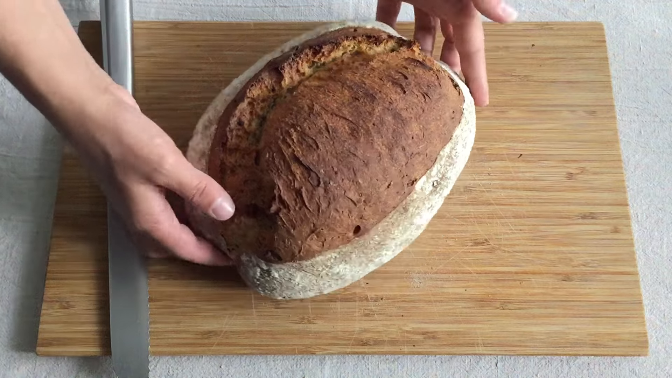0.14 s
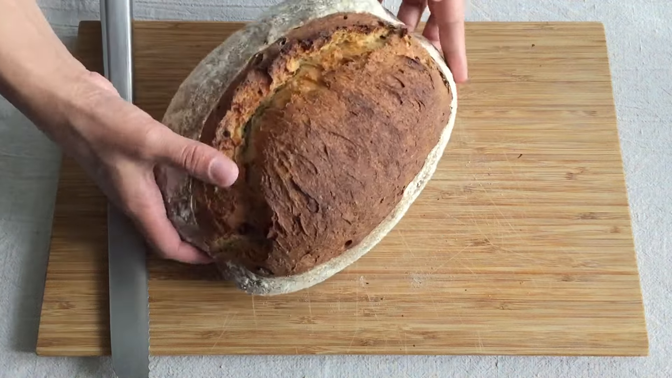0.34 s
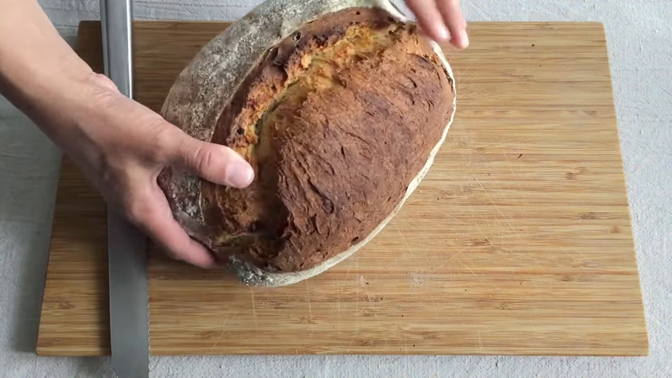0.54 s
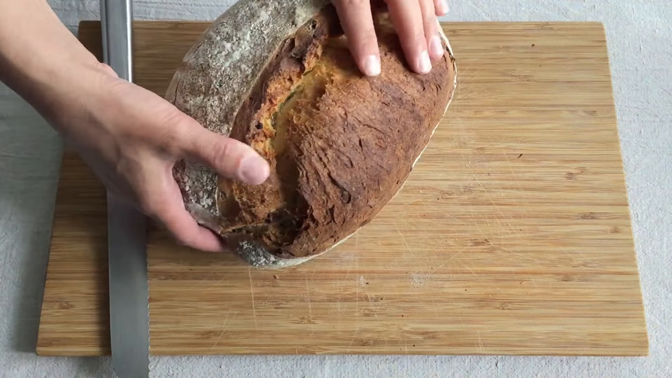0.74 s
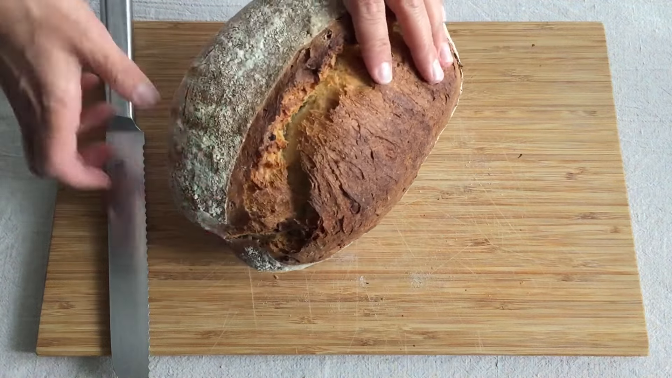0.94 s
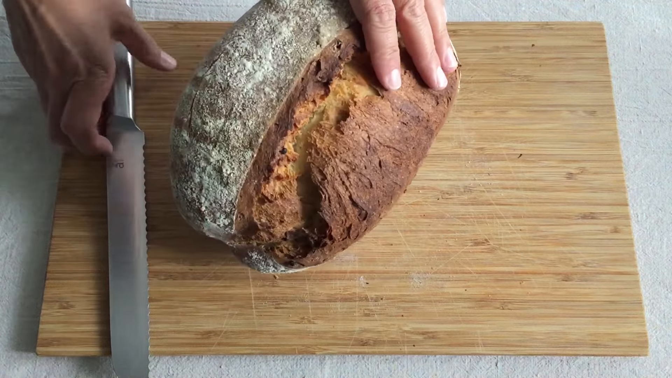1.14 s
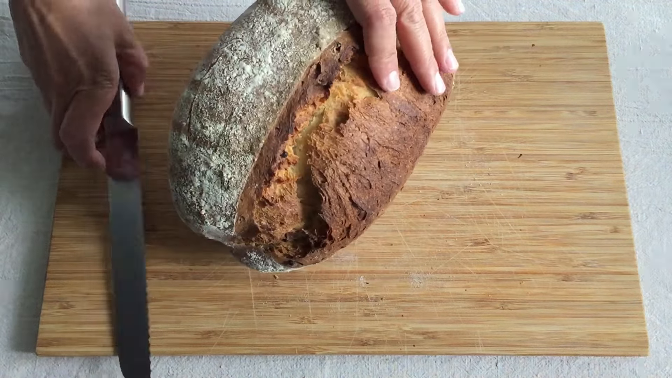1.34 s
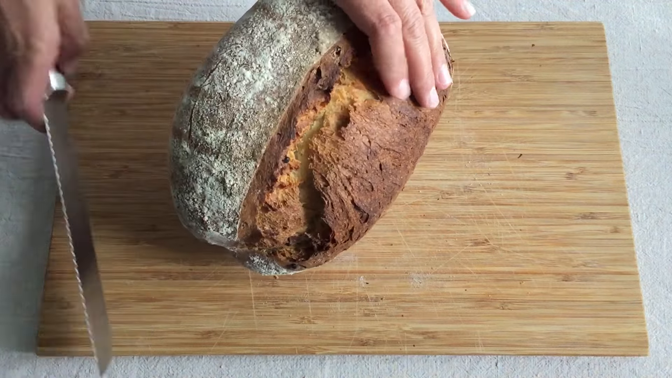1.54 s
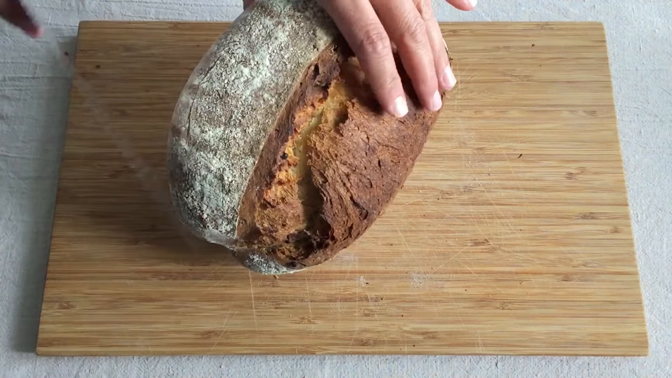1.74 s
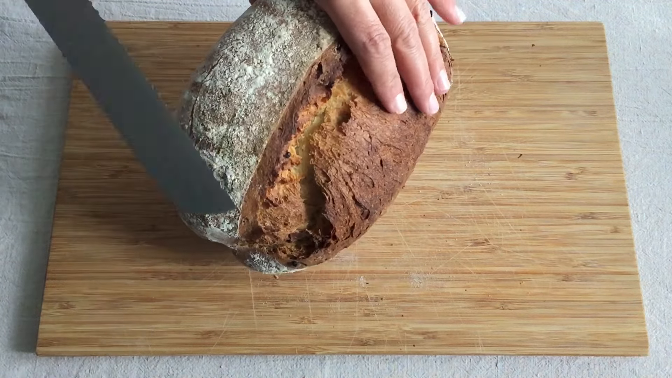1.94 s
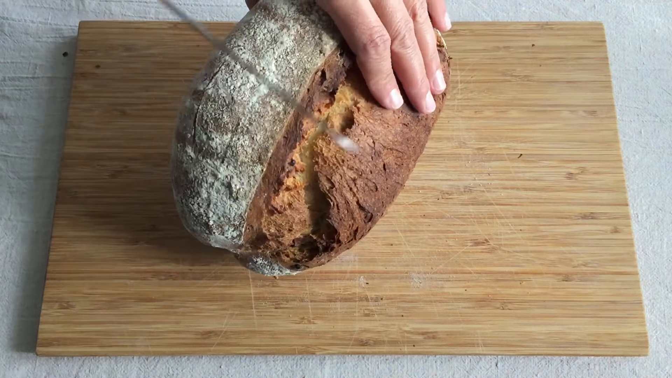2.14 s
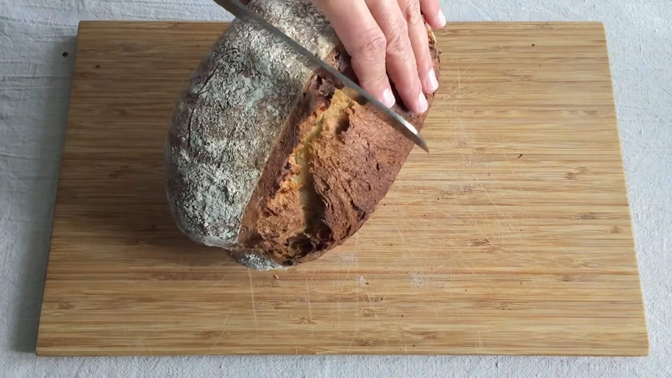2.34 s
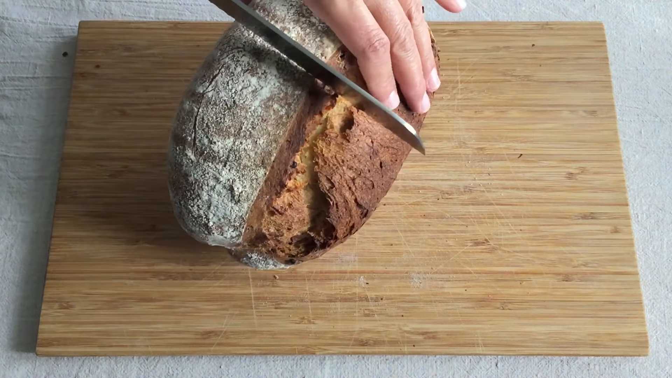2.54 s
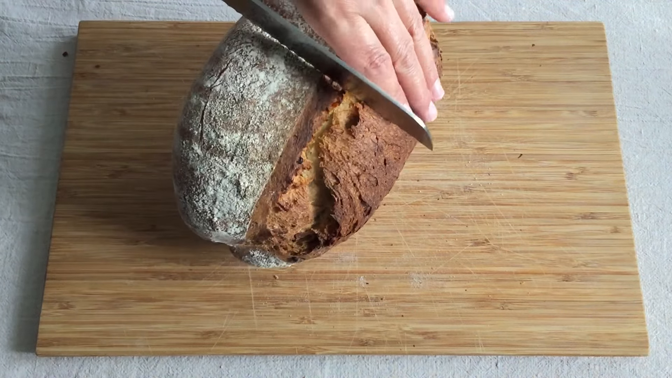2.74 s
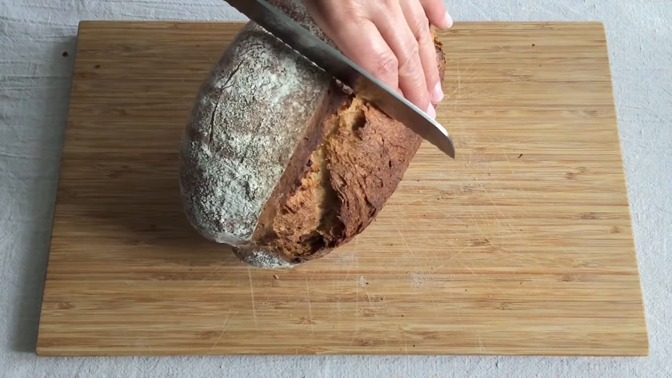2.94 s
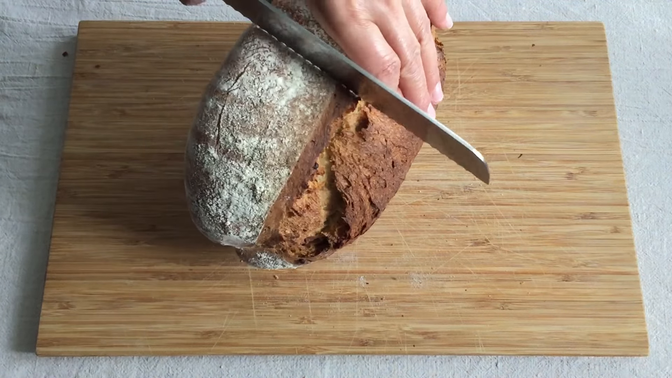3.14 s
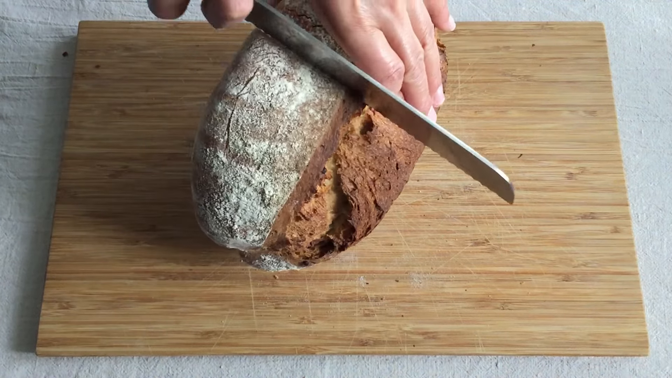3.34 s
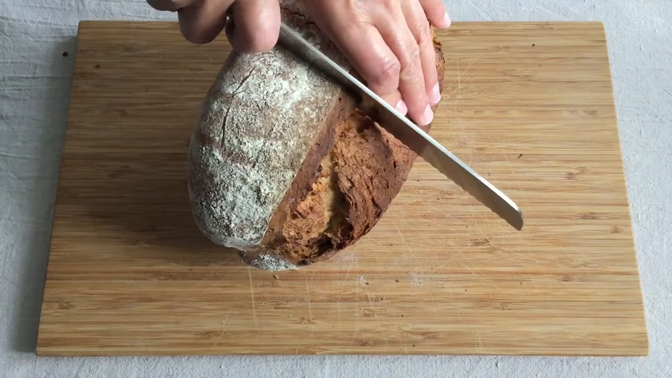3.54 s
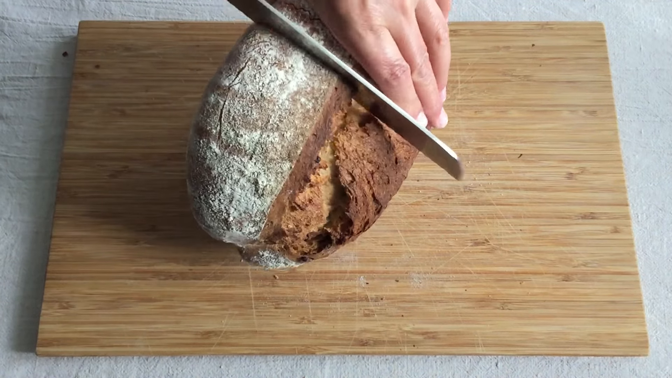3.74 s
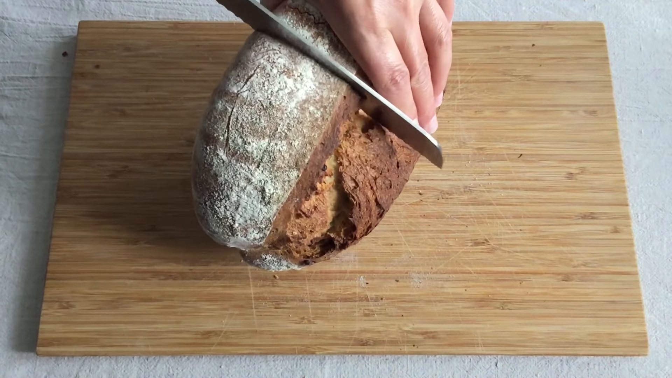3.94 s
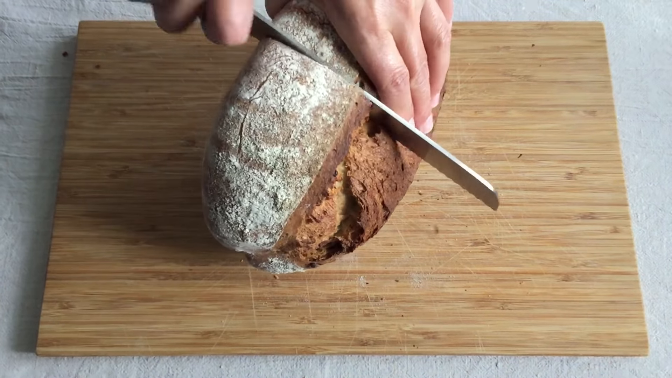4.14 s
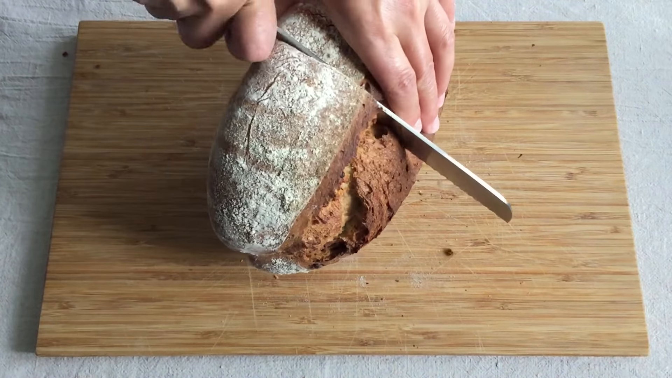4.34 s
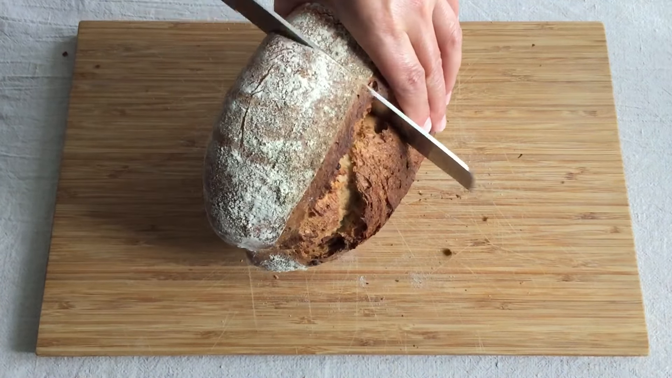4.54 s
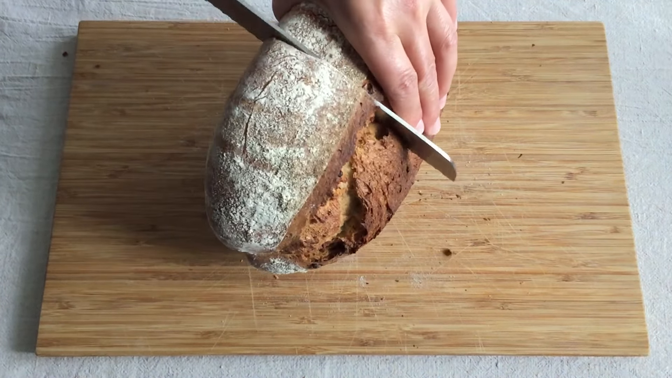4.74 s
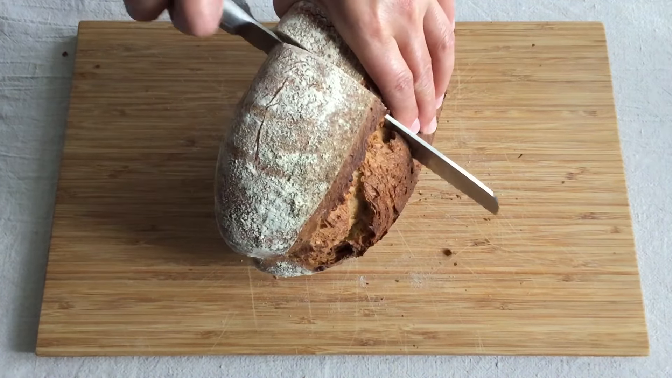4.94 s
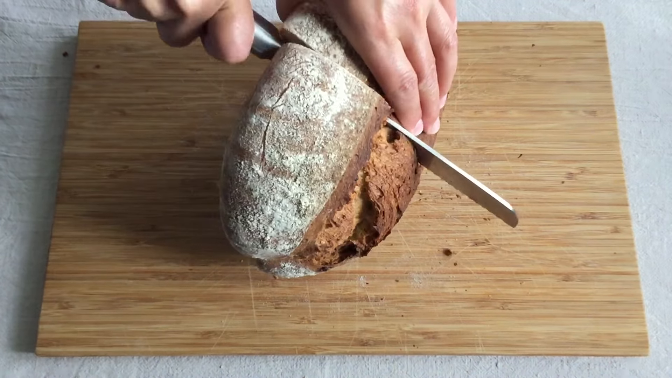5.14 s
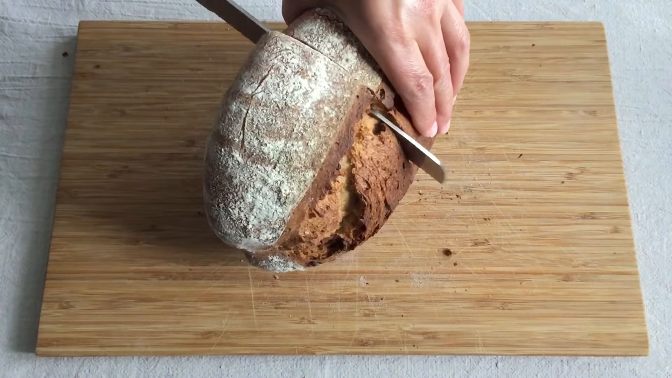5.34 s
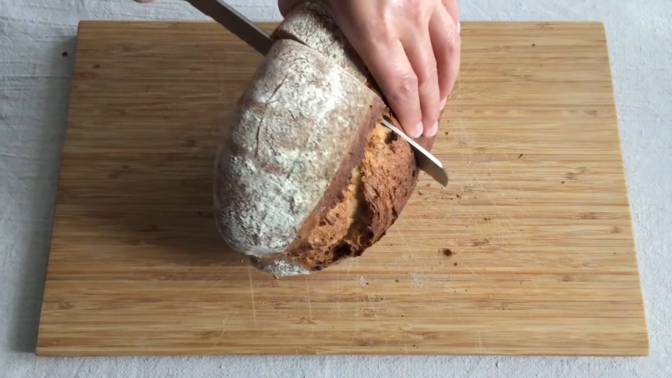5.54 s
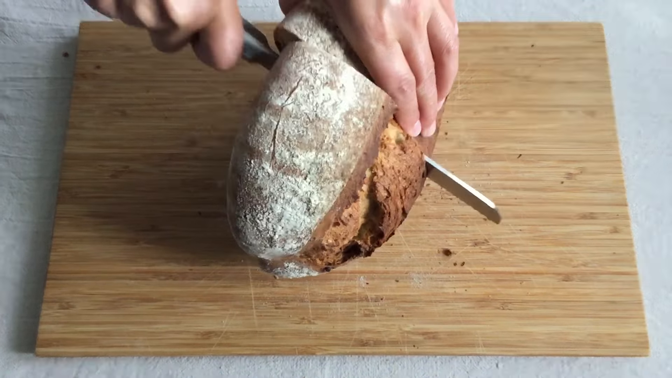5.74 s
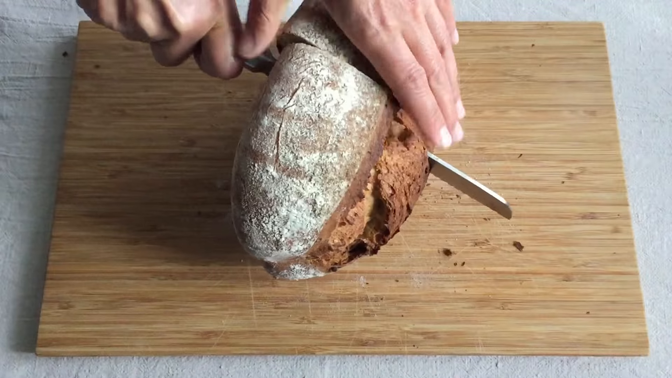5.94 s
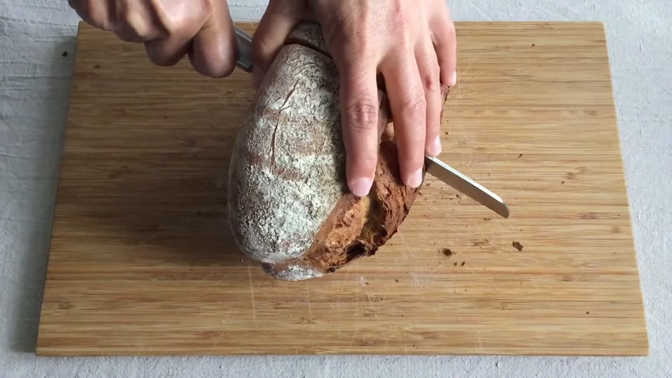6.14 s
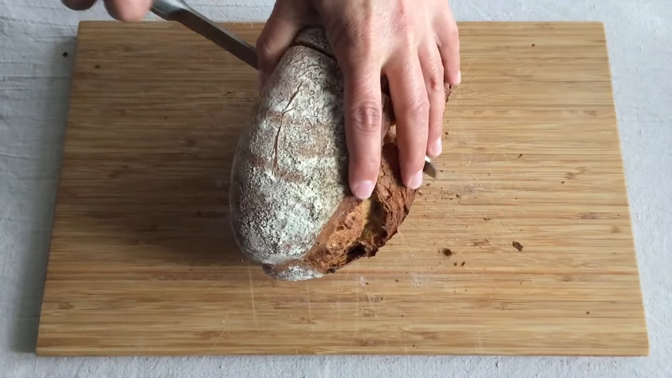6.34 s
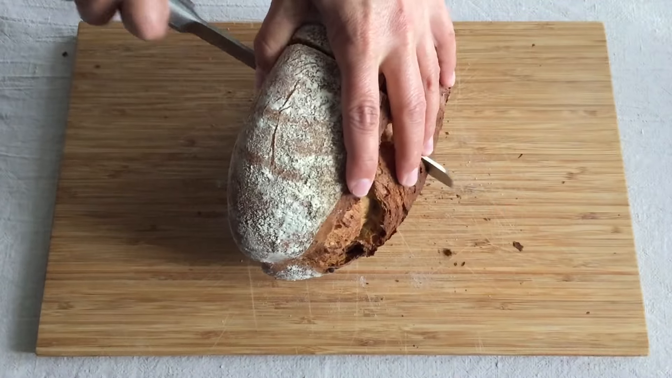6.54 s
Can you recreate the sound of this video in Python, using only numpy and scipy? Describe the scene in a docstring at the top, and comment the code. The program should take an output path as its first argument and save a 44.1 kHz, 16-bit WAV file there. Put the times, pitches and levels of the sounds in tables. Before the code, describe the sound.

A close, single-channel sound in a small kitchen, with soft air and a faint low appliance hum throughout and a short echo. From 0 to 0.8 s a crusty loaf is turned on a wooden board: dull low rumble, soft uneven scrapes, floury hiss, and a cluster of crisp flake ticks around 0.55 s. A gentle rub follows at 1.1 s. At 1.4 s the knife is picked up with a firm knock, a brief damped steel ring and clatter. Light sliding at 2.2 s and a small tap at 2.5 s lead to sawing at 3.0 s. Strokes come unevenly, strongest around 3.0, 3.8 and 4.1 s, with hollow drumming, gritty rasp, bright snaps and crumbly crunches. The rasp grows fuller after about 3.4 s. More bursts come at 4.6, 5.0, 5.3 and 5.6 s; after a near-quiet gap, softer strokes follow at 6.3 and 6.6 s.

```python
"""Small kitchen, one channel, close enough to the board that direct sound outweighs the echo; air and an appliance hum
run throughout. First a crusty loaf is turned on a wooden board: crust rubs on wood and dry flakes tick, over worktop rumble.
Then a serrated knife is picked up with a knock; its steel rings from damped modes, over a thud and a clatter.
From three seconds on it saws in strokes: noise grains from catching teeth drum loaf and board, rasp and crackle,
while noise bursts make the splits of the crust and the deeper bites."""
import sys
import numpy as np
from scipy import signal
from scipy.fft import rfft, irfft
from scipy.io import wavfile

SR = 44100
rng = np.random.default_rng(int(sys.argv[2]) if len(sys.argv) > 2 else 0)


def generate_wav(sig):
    """Save sig (samples, or channels by samples) to the path in sys.argv[1] as 16-bit PCM at SR."""
    pcm = np.round(np.clip(np.atleast_2d(sig).T, -1, 1) * 32767).astype(np.int16)
    wavfile.write(sys.argv[1], SR, pcm)


N = 294940

# Spectrum shape of the still air: [f/Hz, level/dB per Hz]
AIR_SPECTRUM = [(12, -23), (20, -36), (48, 3), (79, -10), (116, -9.5), (168, -13), (399, -23.5), (513, -26),
                (660, -28), (2390, -33.5), (10500, -42.5), (13500, -44), (16000, -44)]
# Appliance hum: [f/Hz, width/Hz, rms level/dB]
HUM_BANDS = [(47, 18, -78), (64.93, 1.4, -52.5), (98.43, 1.64, -56.5), (137.5, 9.6, -66)]
# Worktop shaking under the board: [start t/s, speed-up t/s, hold t/s, slow-down t/s, level/dB]
WORKTOP_SHAKES = [(-.1, 0.09, 0.096, 0.37, -43.5), (.6, 0.22, 0.26, 0.28, -53.5),
                  (1.7, 0.25, 1, 0.15, -56.5), (3.35, .2, 0.35, 0.17, -55), (4.0, 0.094, 0.12, 0.55, -54),
                  (4.9, 0.085, 0.093, 0.33, -50), (5.5, 0.25, 0.077, 0.34, -47.5)]
# Resonances of loaf on board: [f/Hz, width/Hz, level/dB]
LOAF_MODES = [(135.3, 31, 0.5), (180, 40, -2), (243, 62, 6), (289.6, 47, -2), (341.4, 29, -8),
              (662, 103, -9.5), (754.6, 26, -2.5), (944, 31, -10)]
# Spectrum shape of the scrape on wood: [f/Hz, level/dB per Hz]
SCRAPE_SPECTRUM = [(120, -5), (200, 9.5), (269, -4.5), (325, -3), (929, 2), (1800, -4.5), (5000, -18),
                   (6500, -39), (11000, -120)]
# Spectrum shape of the floury hiss: [f/Hz, level/dB per Hz]
FLOUR_SPECTRUM = [(1760, -4), (3000, -3), (3170, -17), (3790, -7), (6800, -6.5), (10800, -7.5), (15500, 5)]
# Loaf, hands and blade sliding: [start t/s, speed-up t/s, hold t/s, slow-down t/s,
# scrape level/dB, hum level/dB, floury hiss level/dB, finest hiss level/dB]
SLIDE_MOVES = [(-.05, 0.045, 0.1, 0.039, -64, -71, -91, -85),
               (0.1, 0.055, 0.02, 0.15, -49.5, -64, -59, -71),
               (0.24, 0.065, 0.037, 0.081, -52, -78, -64.5, -69),
               (0.33, 0.051, 0.048, 0.051, -60, -71, -60, -62),
               (0.43, 0.066, 0.12, 0.044, -60, -74, -72, -67),
               (0.53, 0.0067, 0.036, 0.047, -77, -81, -76, -58),
               (0.59, 0.069, 0.068, 0.089, -50, -69, -56.5, -66),
               (0.71, 0.048, 0.058, 0.066, -63.5, -69, -54.5, -62),
               (0.86, 0.012, 0.012, .02, -76, -80, -70, -55), (0.98, 0.015, .04, 0.033, -80, -77, -74, -81),
               (1.11, 0.076, 0.13, 0.076, -55, -64.5, -62, -67),
               (1.4, 0.027, 0.27, 0.11, -77, -82, -78, -70), (1.7, 0.06, 0.063, 0.053, -81, -85, -72, -66),
               (1.93, 0.056, .05, .06, -87, -84, -82, -67), (2.17, 0.037, 0.083, 0.096, -54, -56, -60, -67),
               (2.34, 0.048, 0.078, 0.046, -64.5, -63, -73, -75),
               (2.6, 0.028, 0.037, 0.059, -72, -78, -90, -85),
               (2.84, 0.069, 0.088, 0.065, -72, -78, -89, -80)]
# Resonances of a dry flake of crust: [f/Hz, width/Hz, level/dB]
FLAKE_MODES = [(3500, 1400, -40), (6220, 550, 10.5), (8700, 1400, 10.5)]
# Flakes ticking off under the fingers: [t/s, ring peak level/dB, top click re ring level/dB]
FLAKE_TICKS = [(0.173, -39, -15), (.315, -53, 10), (0.37, -47, 15), (.539, -14.5, -26), (0.544, -38, -8),
               (0.553, -38, -20), (.569, -36, -15), (.581, -29.5, -10), (.639, -27.5, -11), (.671, -27, -2),
               (.842, -49, 11), (0.994, -54, -5)]
# Modes of the knife's steel: [f/Hz, level/dB, longest t60 t/s]
KNIFE_MODES = [(479, -13, .5), (576, -7, .3), (824, -8, .3), (899, -2, .2), (1017, -4, .2), (1093, 0, .2),
               (1152, -3, .5), (1254, -7, .45), (1427, -4, .45), (1577, -6, .3), (1653, -10, .45),
               (2155, -6, .25), (2277, -4, .2), (2455, -1, .65), (2915, 3, .42), (3400, -8, .25),
               (3526, -5, .5), (3862, -6, .3), (4646, -4, .28), (4829, -14, .3), (5911, -24, .3)]
# Spectrum shape of the dull clatter: [f/Hz, level/dB per Hz]
CLATTER_SPECTRUM = [(120, -31), (200, -10.5), (572, 0), (620, -17), (1140, -3.5), (2680, -8.5),
                    (3000, -27.5), (3250, -10), (9000, -43.5), (11700, -78), (19800, -120)]
# Knife against board and loaf: [t/s, thud peak level/dB, steel ring re thud level/dB,
# bright contact gain level/dB, clatter re thud level/dB, clatter t60 t/s]
KNIFE_KNOCKS = [(1.033, -45.5, -22, 24, -6.5, 0.086), (1.397, -18.5, -1.5, 12, -11, 0.37),
                (1.412, -25, -14, 9, -11, .1), (1.428, -24, -9, 9, -9, 0.25),
                (1.54, -40, -17, -8, -6, 0.15), (2.532, -36.5, -5, 0, -9, 0.07)]
# Spectrum shape of the breaking crust: [f/Hz, level/dB per Hz]
CRUST_SPECTRUM = [(1470, -29), (2500, -2.5), (4270, -4), (4620, -5), (4950, -8), (6110, -2.5), (7650, -7.5),
                  (9150, -7), (10200, -14), (10800, -9), (11600, -7.5), (14900, 0), (16000, 8)]
# The blade splits the crust: [t/s, peak level/dB, centre f/Hz]
CRUST_SPLITS = [(2.945, -37, 4000), (3.0252, -23, 14700), (3.062, -15, 14800), (3.2805, -18.5, 3300),
                (3.361, -24.5, 3260), (3.405, -15, 15300), (3.4537, -15.5, 14700), (3.4955, -11.5, 3260),
                (3.518, -13.5, 14400), (3.529, -21, 14400), (3.5774, -13.5, 15000), (3.6713, -24, 9300),
                (3.7728, -17.5, 5700), (3.9739, -23.5, 13800), (4.009, -16, 15300), (4.0446, -13, 12200),
                (4.08, -15, 6560), (4.113, -15, 9600), (4.195, -18.5, 6800), (4.2354, -17, 14700),
                (4.483, -27, 3140), (4.605, -18.5, 15700), (4.647, -33.5, 3380), (4.84, -31, 3800),
                (4.8927, -14.5, 16500), (4.948, -23.5, 6560), (4.9808, -22, 6400), (4.992, -25, 14700),
                (5.064, -12, 3400), (5.116, -22, 6360), (5.126, -20, 9600), (5.137, -23, 9400),
                (5.2503, -35, 12000), (5.3036, -30, 3200), (5.3402, -22, 14000), (5.4116, -36, 3950),
                (5.4548, -45, 3500), (5.5736, -29, 4090), (5.5993, -14, 14300), (5.615, -11.5, 14700),
                (5.653, -17.5, 15000), (5.743, -17, 6400), (5.852, -36, 12000), (5.9018, -37, 11500),
                (5.9626, -41, 3300), (6.2973, -28.5, 15400), (6.322, -28, 7000), (6.3618, -29, 3380),
                (6.556, -25.5, 3600), (6.614, -28, 3170), (6.6567, -21.5, 3280)]
# Teeth bite deep and the crumb crunches: [t/s, peak level/dB, centre f/Hz]
CRUMB_BITES = [(3.026, -25.5, 670), (3.06, -24.5, 970), (3.28, -34.5, 660), (3.359, -40, 880),
               (3.37, -29.5, 1140), (3.4, -34.5, 1120), (3.452, -43, 2400), (3.494, -32, 2400),
               (3.519, -27, 1000), (3.576, -25.5, 640), (3.67, -39, 643), (3.733, -33, 622),
               (3.778, -28.5, 861), (3.804, -20.5, 526), (3.836, -23, 832), (3.88, -27, 700),
               (4.007, -26, 885), (4.046, -23, 930), (4.083, -21.5, 945), (4.113, -20, 725),
               (4.151, -23.5, 750), (4.193, -24, 2300), (4.307, -33.5, 773), (4.606, -36, 563),
               (4.845, -35, 732), (4.893, -34, 665), (4.927, -28, 610), (4.992, -25, 596), (5.03, -30, 500),
               (5.065, -23, 646), (5.315, -44, 595), (5.341, -40, 533), (5.36, -31, 606), (5.391, -32, 670),
               (5.414, -34.5, 1880), (5.438, -36, 732), (5.598, -34.5, 640), (5.615, -36, 780),
               (5.653, -33, 750), (5.672, -22.5, 770), (5.722, -26, 762), (5.744, -22, 1050),
               (5.78, -29, 926), (5.826, -31.5, 743), (6.298, -41, 751), (6.323, -33, 930),
               (6.335, -36, 738), (6.352, -28.5, 700), (6.363, -29.5, 646), (6.403, -34, 1030),
               (6.584, -33, 775), (6.614, -33, 729), (6.633, -26, 759), (6.653, -28, 770),
               (6.671, -23.5, 716)]
# Spectrum shape of the rasping teeth: [f/Hz, level/dB per Hz]
RASP_SPECTRUM = [(290, -16), (500, 2.5), (849, 4.5), (926, 5.5), (1050, -1), (2000, -0.5), (5000, -20),
                 (6500, -49), (11000, -120)]
# Sawing strokes: [start t/s, speed-up t/s, hold t/s, slow-down t/s,
# drumming level/dB, rasp level/dB, crackle level/dB, finest fizz level/dB], before sinking, stalls and bunching
SAW_STROKES = [(3.005, 0.031, 0.024, 0.1, -33.5, -36.5, -39.5, -33),
               (3.19, 0.014, 0.024, 0.077, -52, -47, -52, -46),
               (3.275, 0.0083, 0.013, 0.12, -45.5, -49, -54.5, -48),
               (3.35, 0.059, 0.14, 0.1, -42.5, -43, -45, -52),
               (3.66, 0.0097, .01, 0.22, -51, -54, -57.5, -49),
               (3.71, 0.092, 0.042, 0.14, -31, -39.5, -39.5, -39),
               (3.975, 0.064, 0.13, 0.24, -30, -36.5, -40, -27.5),
               (4.46, 0.013, 0.055, 0.052, -67, -63.5, -59.5, -46),
               (4.54, 0.057, 0.042, 0.057, -38, -48.5, -47, -61),
               (4.833, 0.014, 0.12, 0.064, -43, -43.5, -54.5, -55),
               (4.95, 0.11, 0.029, 0.1, -34, -37.5, -45, -50),
               (5.26, 0.11, 0.065, 0.051, -33.5, -43.5, -50.5, -47),
               (5.575, 0.053, 0.11, 0.17, -43, -38, -44.5, -49),
               (5.93, 0.028, 0.021, 0.04, -72, -64, -64.5, -68),
               (6.28, 0.056, 0.028, 0.13, -40.5, -49.5, -50.5, -50),
               (6.55, 0.091, .1, .05, -39.5, -41.5, -44.5, -45)]

AIR_DB = -62  # rms above 110 Hz, around which the air wavers
ROOM_DB, ROOM_T60_S, ROOM_TOP_T60_S = -7.5, 0.45, 0.26
TOP_HZ = 15850
FIZZ_HZ = 9800  # edge between crackle and finest fizz
# exponents on speed squared: scrape, hum, hiss, finest hiss
SLIDE_POWER = (1.2, 2.6, 3.2, 1.8)
# exponents on speed squared, and change as the blade sinks in each stroke: drumming, rasp, crackle, fizz
SAW_POWER, SINK_DB_PER_S = (1.75, 0.63, 0.81, 1.3), (2.5, -7, -20.5, -31)
# loss as the blade stalls just before a bite: drumming, rasp, crackle, fizz
STALL_DB, STALL_S = (2.3, 6.6, 6, 3), 0.01
HELD_RING = 1.8  # longest ring of the held steel, in clatter lengths
SNAP_DB, SHOWER_DB, SHOWER_S = 5.5, -6, 0.018
INTO_LOAF_DB = -12.5  # crunch in the loaf, re the split
BREAK_THROUGH_S, BREAK_TAKES_S, RASP_EDGE_HZ = 3.44, 0.078, 1400


def undb(db):
    """Decibels to gain."""
    return 10 ** (np.asarray(db) / 20)


def level(x, db):
    """Scale to an rms level."""
    return x * undb(db) / np.sqrt(np.mean(x ** 2))


def colour(x, points):
    """Causal filter with the given (Hz, dB) response, built from the cepstrum."""
    hz, db = np.transpose(points)
    size = 4096
    f = np.maximum(np.arange(size // 2 + 1) * SR / size, 1)
    log_gain = np.interp(np.log(f), np.log(hz), db) * np.log(10) / 20
    cepstrum = irfft(log_gain)
    # folding the cepstrum makes the response minimum phase
    cepstrum[1:size // 2] *= 2
    cepstrum[size // 2 + 1:] = 0
    response = irfft(np.exp(rfft(cepstrum)))
    return signal.fftconvolve(x, response)[:len(x)]


def band(x, hz, width_hz):
    """One resonance, gain 1 at the centre."""
    return signal.lfilter(*signal.iirpeak(min(hz, .45 * SR), hz / width_hz, SR), x)


def walk(rate, size=N):
    """Random levels, rate of them per second, joined by straight slopes; spread near 1."""
    k = int(SR / rate)
    steps = rng.standard_normal(size // k + 2)
    return np.interp(np.arange(size) / k, np.arange(len(steps)), steps) * 1.2


def grains(rate, spread_db, tail_s):
    """Noise let through in tiny bursts of very unequal size, each with a sharp start and a short tail."""
    when, size = rng.random(N), rng.exponential(size=N)
    bursts = (when < rate / SR) * undb(spread_db * np.minimum(size, 4))
    fade = np.exp(-1 / (tail_s * SR))
    envelope = signal.lfilter([1], [1, -fade], bursts)
    return level(envelope * rng.standard_normal(N), 0)


def shifting(x, low_hz, count, rate, spread_db):
    """Resonances a third of an octave apart come and go, as the contact moves to a new spot."""
    centres = low_hz * 2 ** (np.arange(count) / 3)
    return sum((-1) ** k * undb(spread_db * walk(rate)) * band(x, hz, hz / 5.6)
               for k, hz in enumerate(centres))


def parts(x):
    """Split a sound at the edge between crackle and finest fizz."""
    return [signal.sosfilt(signal.butter(4, FIZZ_HZ, kind, fs=SR, output="sos"), x)
            for kind in ("low", "high")]


def add(out, s, db, sound):
    """Lay a short sound into out at its time and peak level."""
    part = out[int(s * SR):][:len(sound)]
    part += undb(db) * sound[:len(part)] / abs(sound).max()


def moves(table, powers, sink_db_per_s):
    """Gain of each layer: speed rises, holds and falls in every move, and the layer follows a power of it."""
    t, gains = np.arange(N) / SR, np.zeros((len(powers), N))
    for s, rise, hold, fall, *dbs in table:
        at = slice(max(int(s * SR), 0), int((s + rise + hold + fall) * SR))
        age = t[at] - s
        ramp = np.clip(np.minimum(age / rise, (rise + hold + fall - age) / fall), 0, 1)
        speed = np.sin(np.pi / 2 * ramp)
        for gain, db, power, sink in zip(gains, dbs, powers, sink_db_per_s):
            gain[at] += undb(db + sink * age) * speed ** (2 * power)
    return gains


def kitchen():
    """Still air is coloured noise that wavers in level; the appliance hum is noise in narrow resonances."""
    air = colour(rng.standard_normal(N), AIR_SPECTRUM)
    above_rumble = signal.sosfilt(signal.butter(4, 110, "high", fs=SR, output="sos"), air)
    air *= undb(AIR_DB + .8 * walk(3)) / np.std(above_rumble)
    hum = sum(level(band(band(rng.standard_normal(N), hz, width), hz, width), db)
              for hz, width, db in HUM_BANDS)
    return air + hum


def room(dry):
    """Hard walls return a diffuse tail whose treble dies first."""
    t = np.arange(SR) / SR
    noise = rng.standard_normal(SR) * np.clip(t / 0.0014 - .5, 0, 1)  # starts after 0.7 ms
    low = signal.lfilter(*signal.butter(1, 3500, fs=SR), noise)
    treble = noise - low
    tail = low * 1000. ** (-t / ROOM_T60_S) + treble * 1000. ** (-t / ROOM_TOP_T60_S)
    return undb(ROOM_DB) * signal.fftconvolve(dry, tail / np.sqrt(np.sum(tail ** 2)))[:N]


def worktop():
    """A low uneven rumble when weight shifts on the board."""
    gain = moves(WORKTOP_SHAKES, [.6], [0])[0]
    return gain * level(band(band(rng.standard_normal(N), 56, 48), 56, 48), 0)


def loaf(force, wander_db=0):
    """The hollow loaf and the board ring briefly; with wander, a moving grip shifts the weight between the modes."""
    return sum((-1) ** k * undb(db + wander_db * walk(9, size=len(force))) * band(force, hz, width)
               for k, (hz, width, db) in enumerate(LOAF_MODES))


def slide():
    """Soft crust and skin rub on wood: a scrape that wakes the loaf a little and hums now and then, and a finer hiss."""
    rub = grains(2500, 0.94, 0.0043)
    contact = shifting(colour(rub, SCRAPE_SPECTRUM), 289.0, count=12, rate=11.99, spread_db=3.5)
    scrape = level(contact, 0) + level(loaf(rub), -15.5)
    hum = level(band(rub, 770, 52), 0)
    flour = colour(grains(4000, 0.94, 0.0024), FLOUR_SPECTRUM)
    hiss, fine = (level(x, 0) * undb(1.6 * walk(27.9)) for x in parts(flour))
    gains = moves(SLIDE_MOVES, SLIDE_POWER, np.zeros(len(SLIDE_POWER)))
    return (gains * [scrape, hum, hiss, fine]).sum(axis=0)


def ticks():
    """One sharp click rings the flake for a millisecond."""
    out, t = np.zeros(N), np.arange(256) / SR
    click = np.exp(-t / .00003)
    ring = sum(undb(g) * band(click, hz, width) for hz, width, g in FLAKE_MODES)
    top = band(band(click, 13000, 5000), 13400, 5000)
    for s, db, top_db in FLAKE_TICKS:
        add(out, s + 0.00075, db, ring)
        add(out, s + 0.001, db + top_db, top)
    return out


def knocks():
    """A short push thuds in loaf and board; the hand on the handle makes the steel ring unevenly, over a dull clatter."""
    out, t = np.zeros(N), np.arange(SR // 2) / SR
    noises = rng.standard_normal((len(KNIFE_KNOCKS), len(t)))
    for (s, db, ring_db, bright_db, clatter_db, t60), noise in zip(KNIFE_KNOCKS, noises):
        push = np.exp(-t / .0012) * noise
        bright = undb(bright_db) * band(band(push, 1100, 930), 1450, 2600)
        ring = np.zeros(len(t))
        for hz, mode_db, mode_t60 in KNIFE_MODES:
            grip_db = 2.0 * walk(30, size=len(t))
            fade = np.exp(-np.log(1000) * t / min(mode_t60, HELD_RING * t60))
            ring += undb(mode_db + grip_db) * np.sin(2 * np.pi * hz * t) * fade
        # reversed, the same noise serves the clatter apart from the push
        clatter = colour(noise[::-1], CLATTER_SPECTRUM) * np.exp(-np.log(1000) * t / t60)
        add(out, s, db, bright + 2.9 * loaf(push))
        add(out, s, db + ring_db, ring)
        add(out, s, db + clatter_db, clatter)
    return out


def splits():
    """A sharp snap, a spray that thins out fast and a fainter shower of crumbs; part goes into the loaf as a dull crunch."""
    out, t = np.zeros(N), np.arange(2048) / SR
    noises = rng.standard_normal((len(CRUST_SPLITS), 3, len(t)))
    for (s, db, hz), noise in zip(CRUST_SPLITS, noises):
        snap = undb(SNAP_DB) * np.exp(-t / 0.00087)
        shower = undb(SHOWER_DB) * np.exp(-t / SHOWER_S)
        fade = snap + np.exp(-t / 0.004) + shower
        # the third noise makes the grains of the spray unequal
        spray, crunch = noise[:2] * undb(7.5 * noise[2]) * fade
        add(out, s, db, band(spray, hz, 0.068 * hz) + 0.51 * colour(spray, CRUST_SPECTRUM))
        add(out, s, db + INTO_LOAF_DB, band(crunch, 1880, 1770))
    return out


def bites():
    """A coarse tear of a few milliseconds, coloured by the spot that gives way; the jerk shoves the loaf."""
    out, t = np.zeros(N), np.arange(2048) / SR
    shove = -t * np.exp(-t / 0.00059)
    for (s, db, hz), noise in zip(CRUMB_BITES, rng.standard_normal((len(CRUMB_BITES), len(t)))):
        tear = noise * (1 - np.exp(-t / 0.00023)) * np.exp(-t / 0.0067)
        spot = band(tear, hz, 0.32 * hz) + 0.072 * band(tear, 2000, 640)
        add(out, s, db, spot + 0.34 * loaf(tear) + 1400.0 * loaf(shove))
    return out


def stalls():
    """Gain of each saw layer: the teeth hang for a moment before a bite lets them go."""
    t = np.arange(N) / SR
    when = np.sort([s for s, *_ in CRUMB_BITES] + [N])  # N lies far past the end
    until = when[np.searchsorted(when, t)] - t
    return undb(-np.outer(STALL_DB, np.exp(-until / STALL_S)))


def softening(rasp):
    """On the hard outer crust the rasp is thin; once the blade is through, the crumb gives it a fuller low side."""
    through = np.tanh((np.arange(N) / SR - BREAK_THROUGH_S) / BREAK_TAKES_S)
    low_db = 5 * (through - 0.5)  # from -7.5 to +2.5 dB
    low = signal.sosfilt(signal.butter(2, RASP_EDGE_HZ, "low", fs=SR, output="sos"), rasp)
    return rasp + (undb(low_db) - 1) * low


def saw():
    """Teeth catch in bunches: the same bunches swell the drumming, the rasp, the crackle and the fizz."""
    bunch = walk(45)
    drum = loaf(grains(900, 1.8, 0.0006), wander_db=2.0)
    rasp = shifting(colour(grains(700, 3.4, 0.0021), RASP_SPECTRUM), 507.5, count=10, rate=50, spread_db=2.5)
    crackle = shifting(colour(grains(1000, 2.3, 0.0014), CRUST_SPECTRUM), 3265, count=6, rate=45, spread_db=3.5)
    fizz = parts(colour(grains(1400, 4.0, 0.00087), CRUST_SPECTRUM))[1]
    drum, rasp, crackle, fizz = (level(x, 0) * undb(swell_db * bunch)
                                 for x, swell_db in ((drum, 0.4), (rasp, 0.5), (crackle, 0.9), (fizz, 1.3)))
    gains = moves(SAW_STROKES, SAW_POWER, SINK_DB_PER_S) * stalls()
    return (gains * [drum, softening(rasp), crackle, fizz]).sum(axis=0)


def scene():
    """All that happens on the board, its echo, and the kitchen behind."""
    board = saw() + slide() + ticks() + splits() + bites() + knocks()
    return (board + room(board) + worktop() + kitchen())[None]


def record(dry):
    """A steep low-pass ends the sound just below 16 kHz."""
    return signal.sosfilt(signal.ellip(10, .2, 70, TOP_HZ, fs=SR, output="sos"), dry)


dry = scene()
out = record(dry)
generate_wav(out)
```